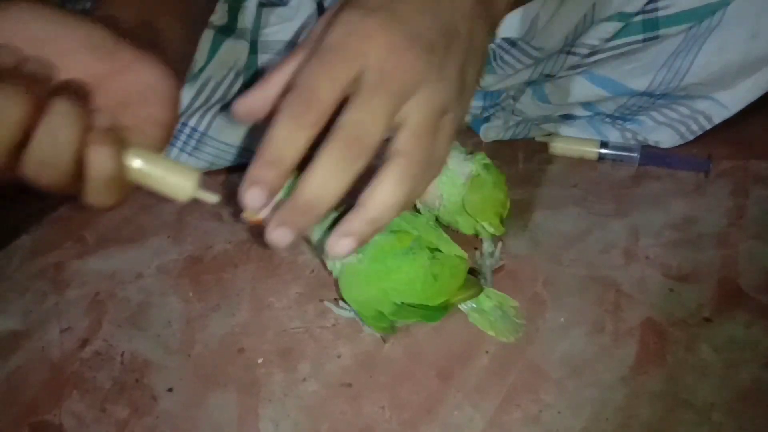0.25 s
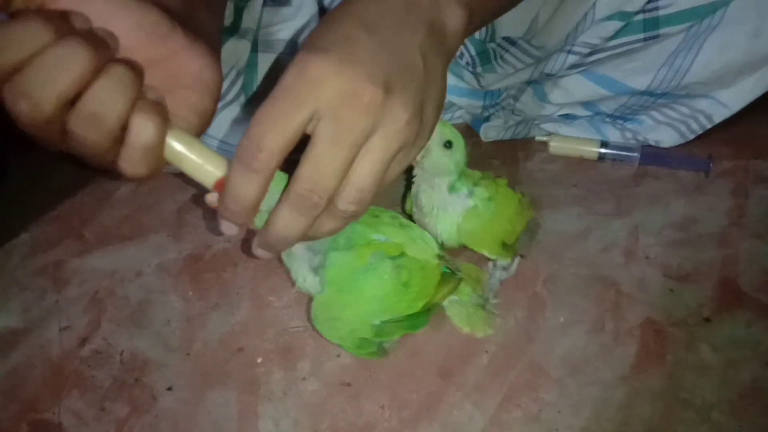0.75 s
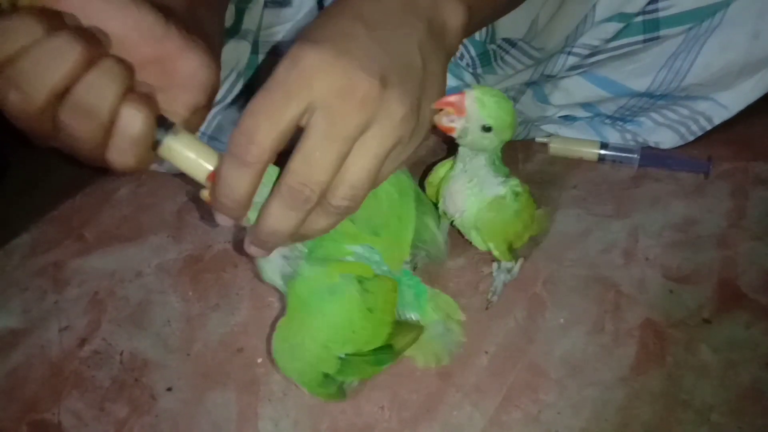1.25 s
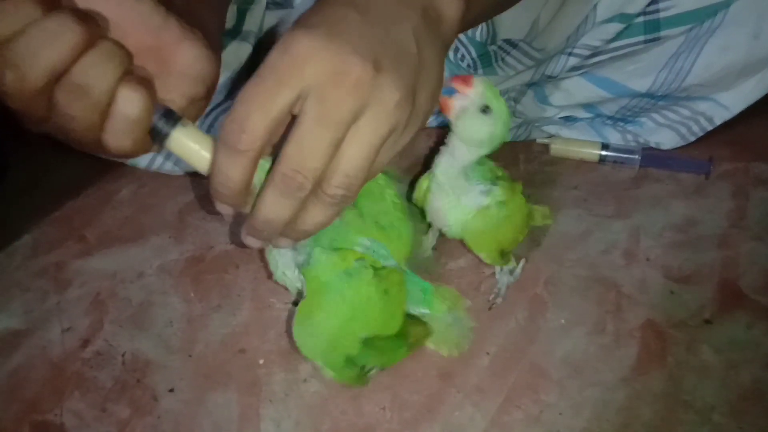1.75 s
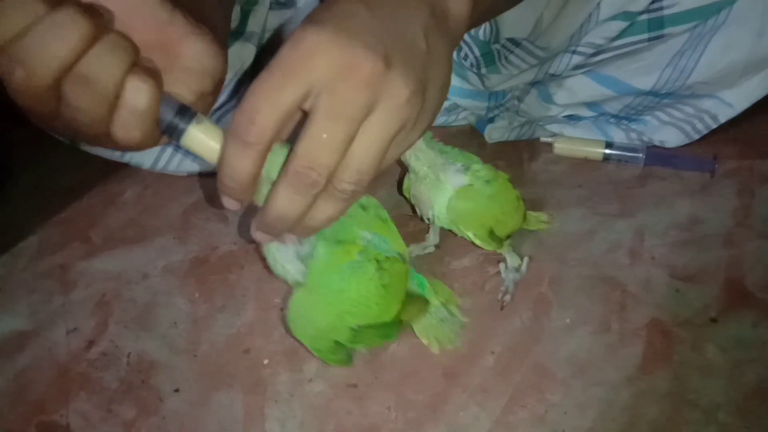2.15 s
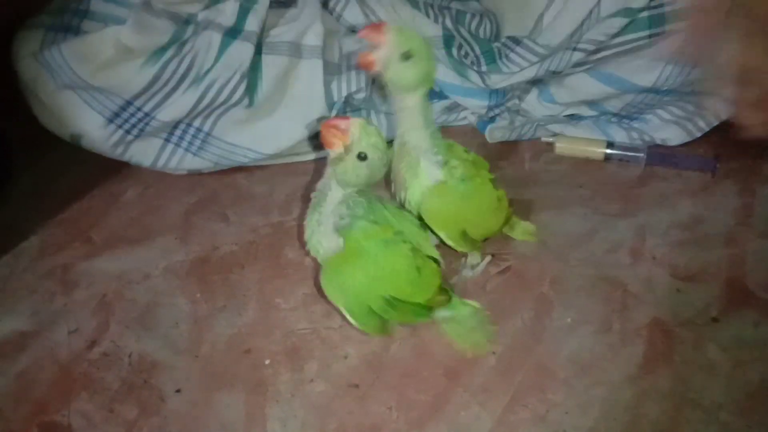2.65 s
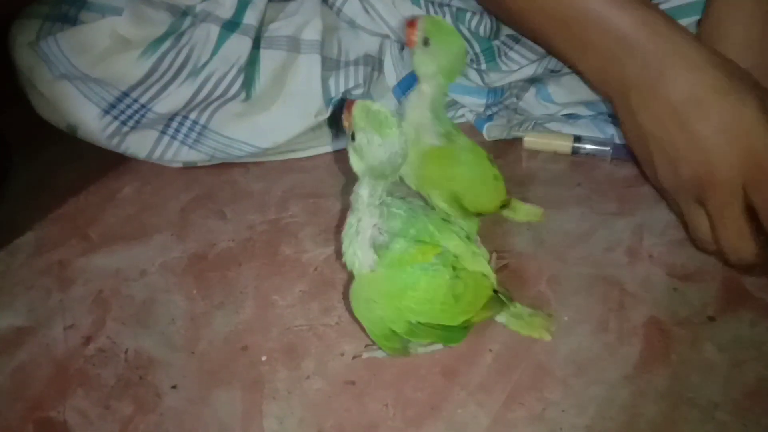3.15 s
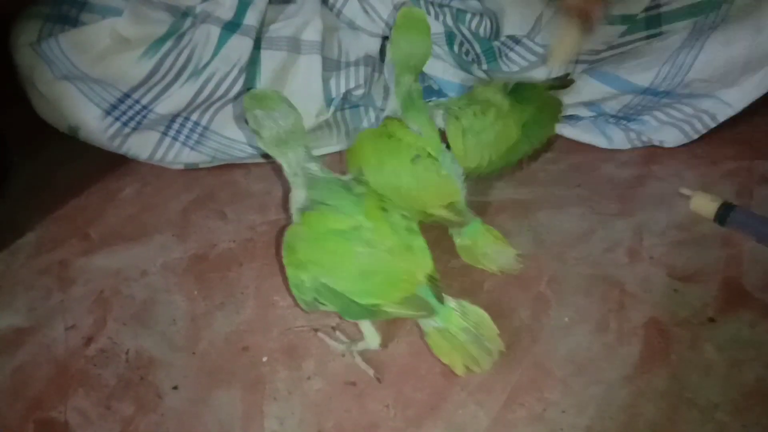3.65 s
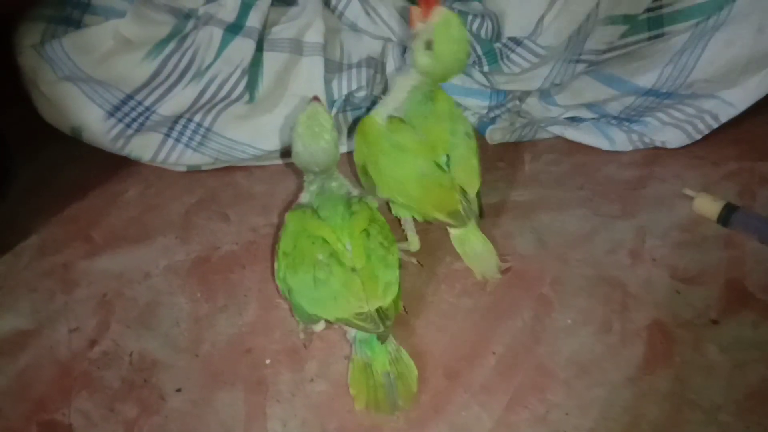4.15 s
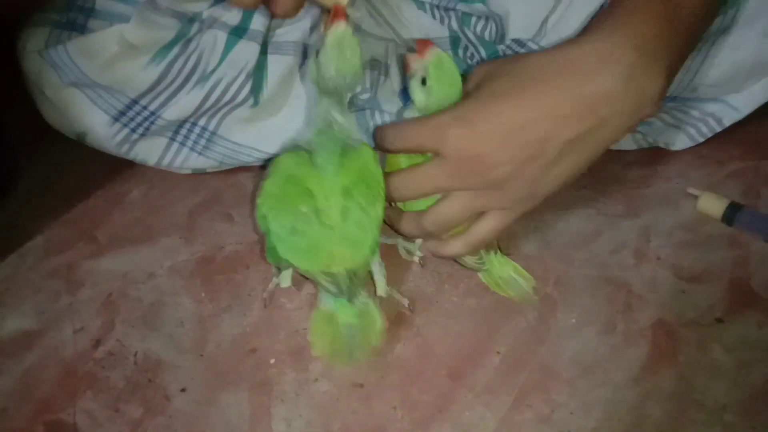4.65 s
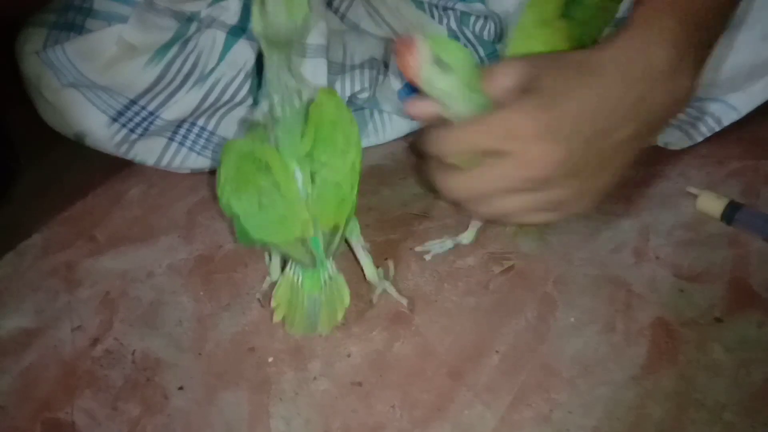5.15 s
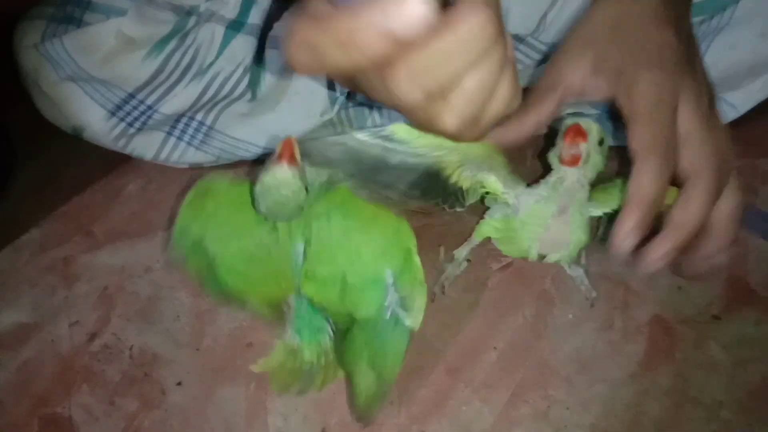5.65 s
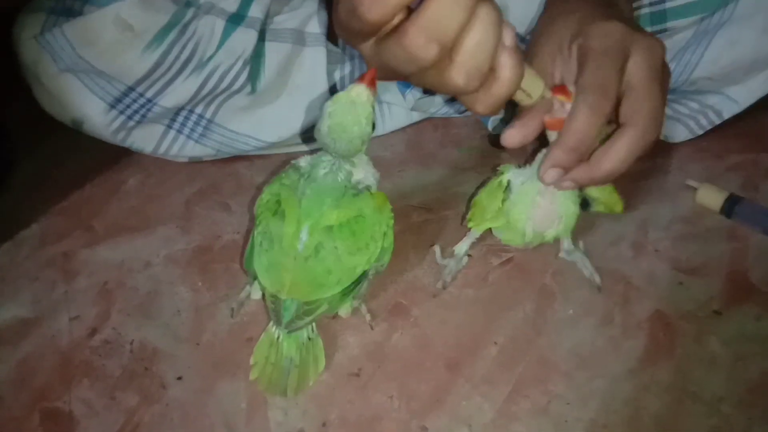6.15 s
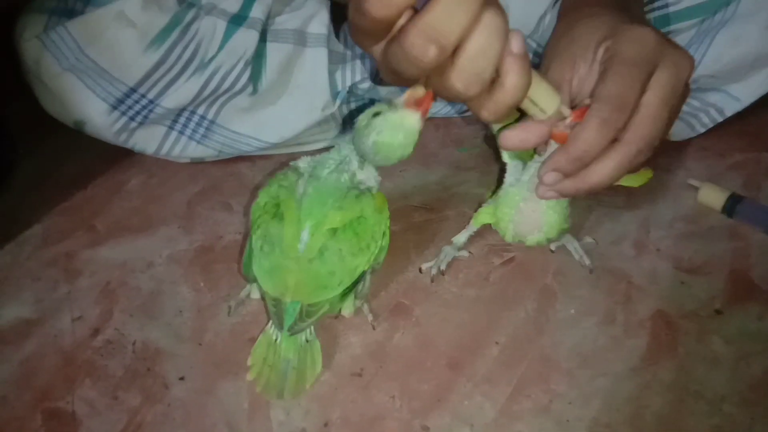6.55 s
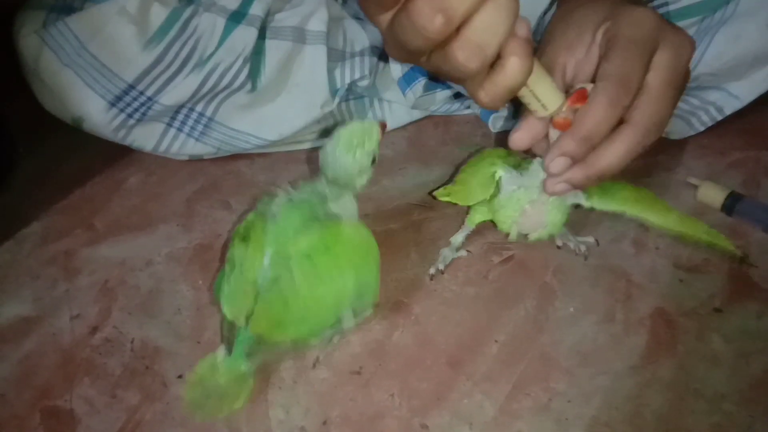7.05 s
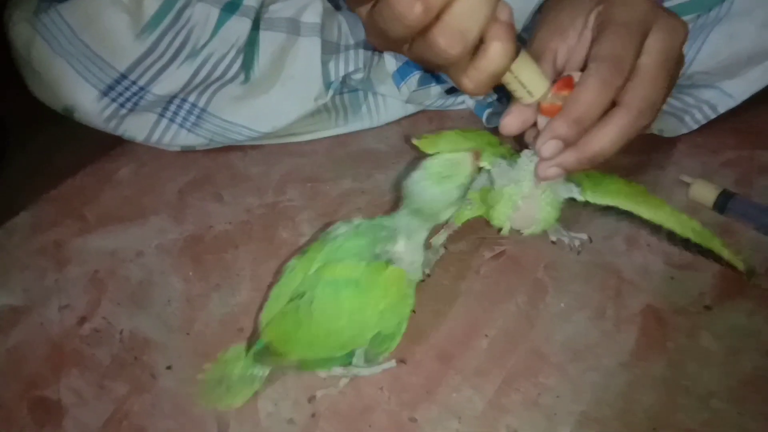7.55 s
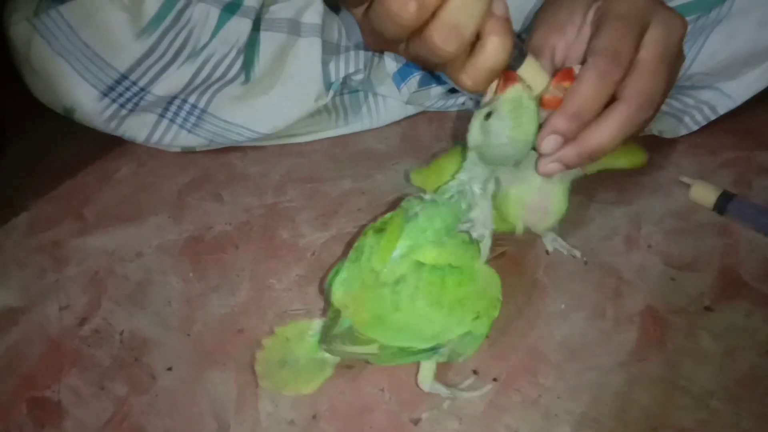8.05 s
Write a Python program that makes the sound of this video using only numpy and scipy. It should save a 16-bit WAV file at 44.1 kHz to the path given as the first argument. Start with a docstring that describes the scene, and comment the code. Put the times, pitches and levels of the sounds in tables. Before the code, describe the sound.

Close, slightly muffled phone sound of parrot chicks being fed in a small room with short reflections. Raspy, airy begging calls come several per second, one whistle cracking into a brief scream early on. A middle run of nasal, arched squawks about five per second gives way to thin peeps, another cracked scream and continuing hoarse hisses. Low rumble stays underneath.

```python
"""Begging parrot chicks

Two parrot chicks beg on a hard floor indoors, close to a phone: shaped noise hisses and rasps,
near sines whistle and break into screams, and harmonic stacks squawk in arched and falling notes.
Claws and beaks tick as short rings with a snap of noise; sparse reflections ring after each sound.
The phone's own low rumble of shaped noise lies under it all; it colours the sound and suppresses noise."""
import sys
import numpy as np
from scipy import signal
from scipy.fft import rfft, irfft
from scipy.io import wavfile
from scipy.ndimage import uniform_filter1d

SR = 44100
rng = np.random.default_rng(int(sys.argv[2]) if len(sys.argv) > 2 else 0)


def to_wav(s):
    """Save 16-bit WAV."""
    ch = np.atleast_2d(s).T  # columns
    pcm = np.round(np.clip(ch, -1, 1) * 32767)  # PCM
    wavfile.write(sys.argv[1], SR, pcm.astype(np.int16))


def ratio_of_db(decibels):
    """Turn decibels (scalar or array-like) into linear amplitude factors; 0 dB maps to 1."""
    return 10 ** (np.asarray(decibels, float) / 20)


N = 366471  # samples, about 8.3 s

# bins [Hz] and frame times [s] of the short-time spectra that shape noise
HZ, FRAMES = np.fft.rfftfreq(512, 1 / SR)[:, None], np.arange(N // 128 + 6) * 128 / SR


def evened(x):
    """Scales to rms 1."""
    return x / np.sqrt(np.mean(abs(x) ** 2) + 1e-20)


def read(points, hz):
    """Value of a spectrum table on a log-frequency axis."""
    f, value = np.transpose(points)
    return np.interp(np.log(hz + 1), np.log(f + 1), value)


def add(mix, s, sound):
    """Mixes a sound in at time s."""
    part = mix[round(s * SR):][:len(sound)]
    part += sound[:len(part)]


def unfold(rows):
    """Sample times and the columns of a table joined by straight lines."""
    s, *columns = np.transpose(rows)
    t = np.arange(s[0], s[-1], 1 / SR)
    return [t] + [np.interp(t, s, c) for c in columns]


def wander(length, rate):
    """Random drift of rms 1, about rate changes a second."""
    size = max(int(SR / rate), 2)
    drift = uniform_filter1d(rng.standard_normal(length), size)
    return evened(uniform_filter1d(drift, size))


def noise(shape, length):
    """Noise of rms 1 whose short-time spectrum has the shape bins x frames, each frame equally strong."""
    a, b = rng.standard_normal((shape.shape[1], 257, 2)).T
    shape = shape / np.sqrt((shape ** 2).mean(0))
    spectrum = shape * (a + 1j * b)
    return evened(signal.istft(spectrum, nperseg=512, noverlap=384)[1][:length])


def spectral_patches(frames, bins_wide, frames_long):
    """Random patches of rms 1 over bins x frames."""
    patches = rng.standard_normal((frames, 257)).T
    patches = uniform_filter1d(patches, size=bins_wide, axis=0)
    return evened(uniform_filter1d(patches, size=frames_long, axis=1))


def hump(hz, centre_hz, width):
    """Gain of a resonance applied twice; it is halved half a width [Hz] from the centre."""
    return 1 / (1 + (2 * (hz - centre_hz) / width) ** 2)


# spectrum of the phone's own rumble: (frequency [Hz], relative level [dB])
RUMBLE = [(15, -57), (25, -30.5), (38, -6), (98, 7), (282, -6), (341, -4.5), (539, -13), (729, -8),
          (840, -11), (1100, -10), (1430, -70.5), (2420, -120)]


def rumble(level_db=-58.5, waver_db=2.0):
    """The phone's own low rumble: white noise takes a bass-heavy spectrum and wavers slowly."""
    white = rng.standard_normal(N)
    shaped = irfft(rfft(white) * ratio_of_db(read(RUMBLE, np.fft.rfftfreq(N, 1 / SR))), N)
    return ratio_of_db(level_db + waver_db * wander(N, 3.5)) * evened(shaped)


# the faint wheeze that runs on under and between the calls, before surges:
# (time [s], level [dB], level of its low hoarse band [dB])
RASP = [(0.0,-36,-44.5), (.2,-36,-51), (.285,-37.5,-54), (0.419,-38.5,-41), (.62,-38.5,-52.5),
        (0.88,-34.5,-44), (1.041,-39.5,-49.5), (1.135,-42.5,-56), (1.199,-36.5,-51), (1.46,-37,-48),
        (1.8,-36,-70.5), (2.17,-34,-70.5), (2.379,-38,-54), (2.559,-39,-54), (2.66,-40.5,-46),
        (2.87,-39.5,-56.5), (3.362,-38.5,-48.5), (3.432,-46.5,-49.5), (3.5,-47.5,-57), (3.56,-39,-51.5),
        (3.8,-34,-50), (3.98,-45,-45), (4.19,-45.5,-42.5), (4.53,-34.5,-57), (4.909,-34,-54),
        (5.06,-40.5,-54.5), (5.201,-39.5,-53), (5.3,-30,-55.5), (5.44,-38,-53.5), (5.7,-40.5,-53),
        (5.8,-38,-52.5), (6.299,-38.5,-50), (6.55,-38.5,-58), (6.781,-34,-56), (7.05,-38,-53),
        (7.2,-35.5,-54), (7.43,-39.5,-57.5), (7.52,-46.5,-59), (7.59,-42.5,-56), (7.66,-46,-60.5),
        (7.75,-41,-53.5), (7.98,-36,-63), (8.31,-34,-60.5)]
# breath spectrum of the wheeze: (frequency [Hz], relative level [dB])
RASP_BREATH = [(1000, -54), (1270, -8.5), (1700, -7), (2800, 1), (4200, -3.5), (5500, -16.5), (7200, -16),
               (10000, -29)]


def rasp(patchy_db=4, surge_db=3.0, hoarse_hz=1297, hoarse_width_hz=327):
    """Faint wheezing breath noise and a low hoarse band; patches and surges come and go."""
    patches = ratio_of_db(patchy_db * spectral_patches(len(FRAMES), 3, 24))
    s, level_db, hoarse_db = np.transpose(RASP)
    t = np.arange(N) / SR
    wheeze_level = ratio_of_db(np.interp(t, s, level_db) + surge_db * wander(N, 9.4))
    wheeze = wheeze_level * noise(ratio_of_db(read(RASP_BREATH, HZ)) * patches, N)
    hoarse_level = ratio_of_db(np.interp(t, s, hoarse_db) + surge_db * wander(N, 9))
    hoarse = hoarse_level * noise(hump(HZ, hoarse_hz, hoarse_width_hz) ** 2 * patches, N)
    return wheeze + hoarse


# thin whistles: (start [s], length [s], first pitch [Hz], last pitch [Hz], level before the swell [dB])
WHISTLES = [(0, 0.11, 1902, 1943, -18), (0.1, .061, 1897, 2510, -23), (5.35, .133, 1938, 1893, -28),
            (5.498, 0.088, 1953, 1866, -26), (5.632, 0.073, 1916, 1870, -27),
            (5.751, 0.086, 1918, 1800, -31), (5.882, 0.14, 1859, 2003, -21)]
# how a whistle swells: (share of its length [0-1], relative level [dB])
WHISTLE_SWELL = [(0, -18.5), (.2, -1), (.4, -0.6), (.7, -3.5), (1, -20)]


def peep(start, length, first_hz, last_hz, level_db):
    """Pitch and level of a thin whistle: a straight glide that swells and fades."""
    share, swell_db = np.transpose(WHISTLE_SWELL)
    hz = first_hz + (last_hz - first_hz) * share
    return np.c_[start + length * share, hz, level_db + swell_db]


# whistles that break into a rough scream: lists of (time [s], pitch [Hz], level [dB], roughness [0-1])
SCREAMS = [
    [(1.34, 1660, -42, 0.22), (1.375, 1910, -36.5, 0.1), (1.387, 2133, -21.5, 0.8), (1.41, 2450, -28, 0.77),
     (1.45, 2410, -35.5, 0.94), (1.5, 2550, -45.5, 0.2)],
    [(6.46, 1750, -40, 0), (6.5, 1785, -42, 0.28), (6.55, 1857, -51, 0.5), (6.6, 1830, -40.5, 0.4),
     (6.635, 2003, -27.5, 0.77), (6.665, 2450, -25.5, 0.53), (6.72, 2530, -45, 0.8)],
]


def whistle(rows, overtone_db=(-14, -15), shake=.075, break_db=7):
    """A near sine; roughness shakes its pitch, breaks it up and brings in overtones."""
    t, hz, level_db, *rough = unfold(rows)
    rough = np.clip(rough[0], 0, 1) if rough else 0
    shaken_hz = hz * (1 + (0.001 + shake * rough) * wander(len(t), 360))
    turns = np.cumsum(shaken_hz) / SR
    tone = np.cos(2 * np.pi * turns)
    for k, db in zip((2, 3), overtone_db):
        tone += rough * ratio_of_db(db) * np.cos(2 * np.pi * k * turns)
    broken = ratio_of_db(break_db * rough * wander(len(t), 250))
    level = np.sqrt(2) * ratio_of_db(level_db)  # sine level counted as rms
    return t[0], level * broken * tone * signal.windows.tukey(len(t), .1)


# how long the reflections ring: (frequency [Hz], time to fall by 60 dB [s])
ROOM = [(1000, 0.26), (2000, 0.27), (6000, 0.32), (12000, 0.19)]


def room(x):
    """Sparse reflections of random sign, each band dying at its own speed."""
    taps = np.zeros(SR)
    at = np.arange(200, SR - 20, 20)
    taps[at + rng.integers(0, 20, len(at))] = rng.choice([-1., 1.], len(at))
    hz, t, z = signal.stft(taps, SR, nperseg=256)
    decay = ratio_of_db(-60 * t / read(ROOM, hz)[:, None])
    tail = signal.istft(z * decay, SR, nperseg=256)[1]
    return signal.fftconvolve(x, tail / np.linalg.norm(tail))[:N]


# hisses and rasps, one row a burst:
# (start [s], peak [s], effort [dB], throat resonance [Hz], throat width before the ring's widening [Hz])
HISSES = [(0.314, 0.386, -31, 3420, 510), (0.315, 0.337, -31.5, 5000, 944), (0.386, 0.455, -20, 5470, 600),
          (0.525, 0.575, -20, 6080, 900), (0.873, 0.935, -26, 5570, 1600), (1.003, 1.046, -39, 2270, 864),
          (1.167, 1.203, -25.5, 5110, 1432), (1.208, 1.287, -35.5, 2800, 1624),
          (1.384, 1.401, -29, 4870, 410), (1.594, 1.597, -37.5, 2260, 1072),
          (1.747, 1.787, -21, 5710, 1170), (1.93, 1.981, -23, 6130, 1003), (2.087, 2.109, -28, 5340, 1568),
          (2.305, 2.325, -43.5, 7640, 900), (2.306, 2.322, -34.5, 3740, 856),
          (2.386, 2.417, -33, 2760, 700), (2.593, 2.678, -21.5, 6180, 736),
          (2.984, 2.969, -29.5, 3760, 728), (3.089, 3.131, -24, 5590, 544), (3.252, 3.287, -35, 3566, 220),
          (3.472, 3.5, -44, 5380, 940), (3.511, 3.552, -34, 3420, 806), (3.773, 3.824, -34.5, 6960, 850),
          (3.871, 3.892, -23, 3800, 300), (3.98, 4.04, -19.5, 5400, 610), (4.19, 4.299, -26, 6160, 835),
          (4.347, 4.353, -30, 2650, 616), (4.403, 4.507, -29, 5140, 860), (4.642, 4.665, -20.5, 5460, 1568),
          (4.862, 4.93, -36.5, 4780, 1288), (4.983, 5.023, -35.5, 3650, 500),
          (5.089, 5.144, -37, 3380, 1272), (5.311, 5.4, -31.5, 3790, 304), (5.455, 5.519, -19, 6080, 1080),
          (5.743, 5.759, -29, 3600, 650), (5.779, 5.838, -28.5, 3590, 480), (5.887, 5.962, -31, 2980, 928),
          (5.911, 6.001, -27, 3590, 650), (6.095, 6.093, -29.5, 5000, 900), (6.168, 6.199, -22, 4630, 1016),
          (6.311, 6.393, -33, 3880, 1272), (6.38, 6.406, -23, 5860, 1360), (6.629, 6.652, -38, 7050, 505),
          (6.677, 6.721, -24.5, 3664, 220), (6.79, 6.848, -21.5, 6200, 1224),
          (6.804, 6.888, -30.5, 3410, 600), (6.949, 6.939, -27.5, 3930, 640),
          (7.131, 7.145, -32, 3810, 800), (7.261, 7.268, -34, 3570, 220), (7.394, 7.442, -38, 3720, 728),
          (7.569, 7.57, -34.5, 3460, 530), (7.671, 7.708, -39.5, 3750, 1072),
          (7.77, 7.775, -34, 3050, 1072), (7.814, 7.901, -18.5, 6420, 1496),
          (7.995, 8.127, -28.5, 3600, 667), (8.041, 8.122, -26, 5750, 1165)]
# rasps whose throat slides as the beak moves: (start [s], peak [s], effort [dB],
# throat resonance at the peak [Hz], throat width before the ring's widening [Hz], slide [Hz per s])
SLIDES = [(1.432, 1.514, -27.5, 3910, 700, -5000), (1.639, 1.758, -28, 3110, 600, -9000),
          (2.11, 2.285, -34, 2714, 310, -2500), (2.755, 2.801, -26.5, 5430, 580, -8000),
          (2.866, 2.942, -34.5, 2880, 224, -2500), (5.223, 5.237, -27.5, 3590, 700, -8000),
          (6.116, 6.156, -21.5, 4400, 800, 9006)]
# breath spectrum of a hiss: (multiple of the throat resonance [ratio], relative level [dB])
HISS_BREATH = [(.2, -35), (.5, -19.5), (.8, -8.5), (1.3, -17), (1.7, -16.5), (2, -20), (2.4, -20.5),
               (4, -53)]
# windpipe rings, heard below the throat resonance:
# (frequency [Hz], width [Hz], level before the throat-width gain [dB])
WINDPIPE = [(3800, 500, -13), (2500, 3700, -26), (1296, 117, -31.5)]


def hiss(start, peak, effort_db, throat_hz, width, slide=0,
         rise_db=11, fall_db=18, fade_s=0.097, flutter_db=2, patchy_db=4.5):
    """Chaotic air through the syrinx rings in the throat; it starts at once, swells, fades and flutters."""
    end = peak + fade_s
    t = np.arange(start, end, 1 / SR)
    before = np.maximum(peak - t, 0) / max(peak - start, .004)
    after = np.maximum(t - peak, 0) / fade_s
    swell_db = -rise_db * before ** 1.09 - fall_db * after ** 1.04
    patches = spectral_patches(len(t) // 128 + 6, 2, 30)
    throat_hz = throat_hz + slide * (start - peak + FRAMES[:patches.shape[1]])
    openness = width / 1000  # a wide throat lets more breath pass
    breath = ratio_of_db(read(HISS_BREATH, HZ / throat_hz)) * openness
    ring = hump(HZ, throat_hz, 1.59 * width) ** 2
    pipe = sum(ratio_of_db(db) * hump(HZ, hz, wide) ** 2 * (hz < throat_hz) for hz, wide, db in WINDPIPE) * openness
    no_bass = hump(np.minimum(HZ, 1150), 1400, 300)  # a small bird
    shape = (ring + pipe + breath) * no_bass
    flutter = evened(ratio_of_db(flutter_db * wander(len(t), 210)))
    edges = np.clip(np.minimum((t - start) / 0.0058, (end - t) / 0.077), 0, 1)
    air = noise(shape * ratio_of_db(patchy_db * patches), len(t))
    return start, ratio_of_db(effort_db + swell_db) * edges * flutter * air


# claw and beak ticks: (time [s], strength before the band filter [dB], ring pitch [Hz])
TICKS = [(1.103, -43, 9000), (1.662, -38, 9000), (3.039, -26, 6530), (3.1308, -34, 6970),
         (3.2992, -15, 6940), (3.3386, -33.5, 6520), (3.3524, -25.5, 7000)]


def tick(db, hz, snap_db=0.0, deep_hz=65):
    """A snap of noise and a very short ring; a harder tick reaches lower."""
    t = np.arange(1500) / SR
    dying = ratio_of_db(-60 * t / .009)  # falls by 60 dB in 9 ms
    snap = dying * rng.standard_normal(len(t))
    ring = dying * np.sin(2 * np.pi * hz * t)
    low_hz = min(deep_hz * ratio_of_db(-db), 7000)  # deep_hz is the low edge at 0 dB
    band = signal.butter(2, (low_hz, 15000), "band", fs=SR)
    return ratio_of_db(db) * signal.lfilter(*band, ring + ratio_of_db(snap_db) * snap)


# falling notes of the other chick, whose throat stays put:
# (start [s], length [s], first pitch [Hz], last pitch [Hz], effort before the note's shape [dB])
FALLS = [(3.439, 0.14, 1698, 1291, -34.5), (3.645, 0.058, 1757, 1224, -27), (3.811, 0.072, 1925, 1393, -24),
         (3.972, .05, 2030, 1190, -22), (4.136, .065, 1994, 1216, -21), (4.305, 0.069, 2080, 1200, -22)]
# how a note falls: (share of its length [0-1], share of the pitch fall [0-1], relative effort [dB])
FALL_SHAPE = [(0, 0.048, -2), (0.152, .1, -0.7), (0.452, 0.81, 0.5), (.7, .92, -13), (0.998, 1, -17)]


def fall(start, length, first_hz, last_hz, effort_db):
    """Pitch and effort of a falling note."""
    share, fallen, shape_db = np.transpose(FALL_SHAPE)
    hz = first_hz + (last_hz - first_hz) * fallen
    return np.c_[start + length * share, hz, effort_db + shape_db]


# arched squawks: (start [s], top [s], end [s], top pitch [Hz], effort at the top [dB],
# throat resonance at the top [Hz], flatness of the top [exponent])
ARCHES = [(3.773, 3.819, 3.897, 1423, -21, 6480, 2.25), (3.995, 4.047, 4.125, 1346, -22.5, 4400, 2.66),
          (4.213, 4.253, 4.345, 1303, -21, 4300, 2.5), (4.429, 4.464, 4.56, 1335, -21.5, 5020, 4),
          (4.65, 4.684, 4.772, 1413, -21, 4480, 2.6), (4.855, 4.889, 4.985, 1315, -20, 4320, 3.34)]


def arch(start, top, end, top_hz, effort_db, throat_hz, flatness):
    """Pitch climbs to the top and drops; effort comes in softly and gives out; the throat opens and shuts."""
    climb, drop, sag = .21, .54, 0.0298  # shares of the top pitch
    come_in_db, give_out_db, give_out_power = -7, -13, 3.5
    throat_shut = 0.41  # share by which the throat resonance sinks at both ends
    t = np.linspace(start, end, num=24)
    before = np.maximum(top - t, 0) / (top - start)
    after = np.maximum(t - top, 0) / (end - top)
    hz = top_hz * (1 - climb * before ** flatness - sag * after - drop * after ** flatness)
    effort = effort_db + come_in_db * before ** 2 + give_out_db * after ** give_out_power
    throat = throat_hz * (1 - throat_shut * (before + after))
    return np.c_[t, hz, effort, throat]


# partials before the throat: (frequency [Hz], relative level [dB])
SQUAWK_SOURCE = [(500, -5.5), (950, -9.5), (1300, -4.5), (2600, -11.5), (5000, -9.5), (8000, -1),
                 (16000, 2)]
# stretches where every second pulse is weaker, which adds partials halfway between:
# (start [s], end [s], level before its 19 ms fades [dB])
DOUBLINGS = [(4.457, 4.561, -5), (4.747, 4.749, 2)]


def squawk(rows, ring_db=8, width=1400, jitter=0.00084, waver_db=4, rasp_db=1.5, glide_s=0.0057,
           still_hz=3200, fray=0.068, dulling=.14, full_db=-22):
    """A harmonic stack; the throat lifts nearby partials, each wavers and rasps, weak effort dulls the top."""
    t, hz, effort_db, *throat = unfold(rows)
    is_arch = bool(throat)
    throat, reach_hz = (throat[0], 7500) if is_arch else (still_hz, 5000)  # the still throat dulls the top
    hz = uniform_filter1d(hz, int(glide_s * SR) + 1)
    unsteady = jitter * wander(len(t), 150)
    frayed = fray * is_arch * (1 - hz / hz.max()) * wander(len(t), 900)  # an arch frays below its top
    hz = hz * (1 + unsteady + frayed)
    turns = np.cumsum(hz) / SR
    halves = sum(ratio_of_db(db) * np.clip(np.minimum(t - a, b - t) / 0.019, 0, 1) for a, b, db in DOUBLINGS)
    weakness_db = np.minimum(effort_db - full_db, 0)
    out = np.zeros(len(t))
    for k in np.arange(2, 30) / 2:  # whole partials and those halfway between
        if k % 1 and not halves.any():
            continue
        partial_hz = k * hz
        waver = waver_db * min(k / 3, 1) * wander(len(t), 28.4)
        gain = ratio_of_db(read(SQUAWK_SOURCE, partial_hz) + waver + rasp_db * wander(len(t), 410))
        gain *= (1 + ratio_of_db(ring_db) * hump(partial_hz, throat, width)) * (partial_hz < 16000)
        gain *= hump(np.maximum(partial_hz, throat), throat, reach_hz)
        gain *= ratio_of_db(dulling * (k - 3.5) * weakness_db)  # tilts the stack around partial 3.5
        gain *= halves if k % 1 else 1
        out += gain * np.cos(2 * np.pi * (k * turns + rng.random()))
    return t[0], ratio_of_db(effort_db) * evened(out) * signal.windows.tukey(len(t), .14)


# phone microphone response: (frequency [Hz], gain [dB])
MICROPHONE = [(900, -2.5), (5500, 2), (6600, -2), (7250, 3), (8000, -8), (10000, -14.5), (13200, -30.5),
              (15000, -6), (16000, -19)]


def microphone(x):
    """The phone microphone colours the treble with peaks and dips."""
    return irfft(rfft(x) * ratio_of_db(read(MICROPHONE, np.fft.rfftfreq(N, 1 / SR))), N)


def suppress(x, margin_db=6, depth_db=8, from_hz=1000):
    """Noise suppression: lowers the bins that lie near their own quiet level."""
    hz, _, z = signal.stft(x, SR, nperseg=512, noverlap=384)
    power = uniform_filter1d(uniform_filter1d(abs(z) ** 2, size=3, axis=1), size=12, axis=2)
    quiet = np.percentile(power, q=15, axis=2, keepdims=True)
    over_db = 10 * np.log10(power / quiet + 1e-12)
    cut_db = depth_db * np.clip(1 - over_db / margin_db, 0, 1) * (hz > from_hz)[:, None]
    return signal.istft(z * ratio_of_db(-cut_db), SR, nperseg=512, noverlap=384)[1][:, :N]


def scene():
    """All calls and ticks, their reflections and the rumble."""
    birds = rasp()
    for rows in [peep(*row) for row in WHISTLES] + SCREAMS:
        add(birds, *whistle(rows))
    for row in HISSES + SLIDES:
        add(birds, *hiss(*row))
    for s, db, hz in TICKS:
        add(birds, s, tick(db, hz))
    for rows in [fall(*row) for row in FALLS] + [arch(*row) for row in ARCHES]:
        add(birds, *squawk(rows))
    room_db = -6
    return (birds + ratio_of_db(room_db) * room(birds) + rumble())[None]


def low_pass(x):
    """Removes everything above the highest recorded frequency."""
    return signal.sosfilt(signal.butter(12, 16640, fs=SR, output="sos"), x)


def record(dry):
    """The phone: its microphone, then noise suppression."""
    coloured = microphone(dry)
    finished = suppress(coloured)
    return low_pass(finished)


dry = scene()
out = record(dry)
to_wav(out)
```